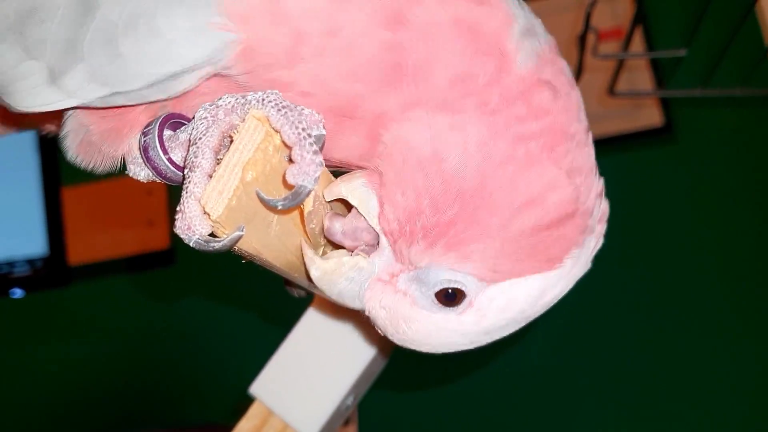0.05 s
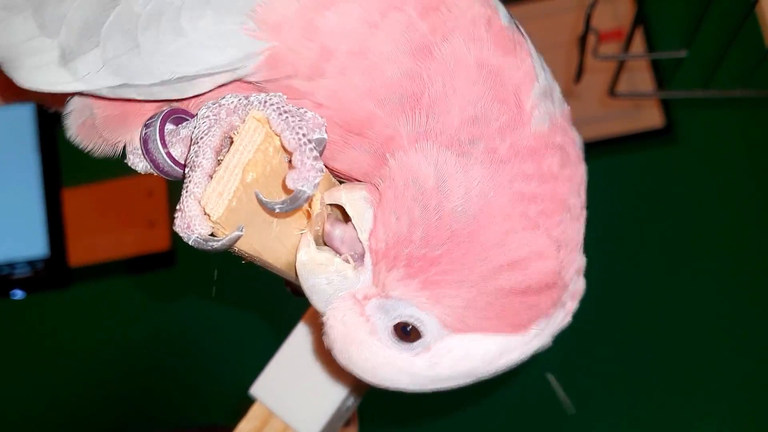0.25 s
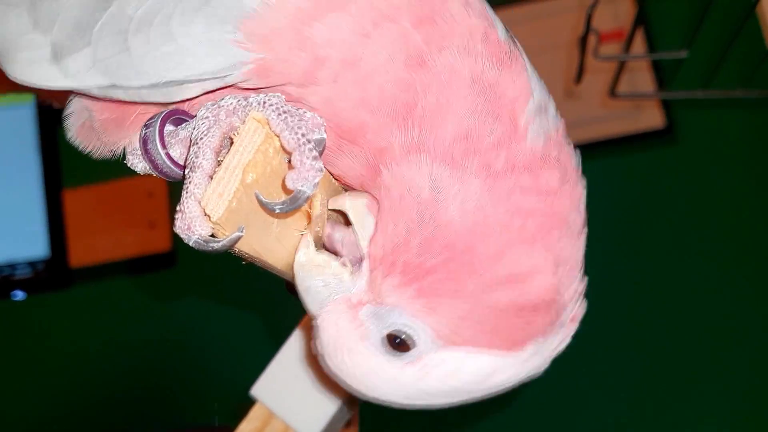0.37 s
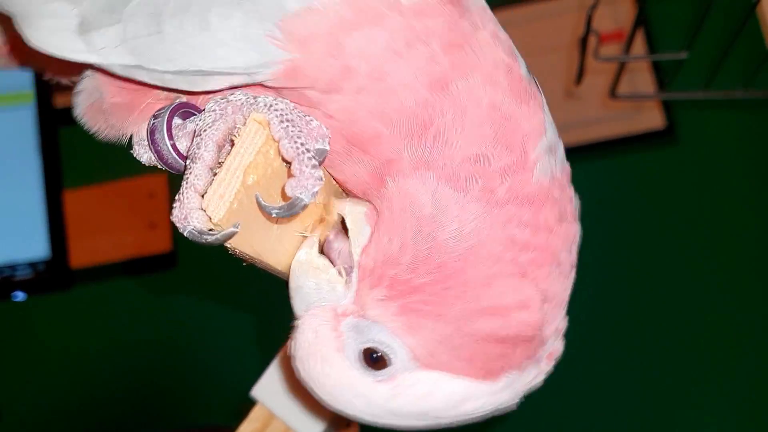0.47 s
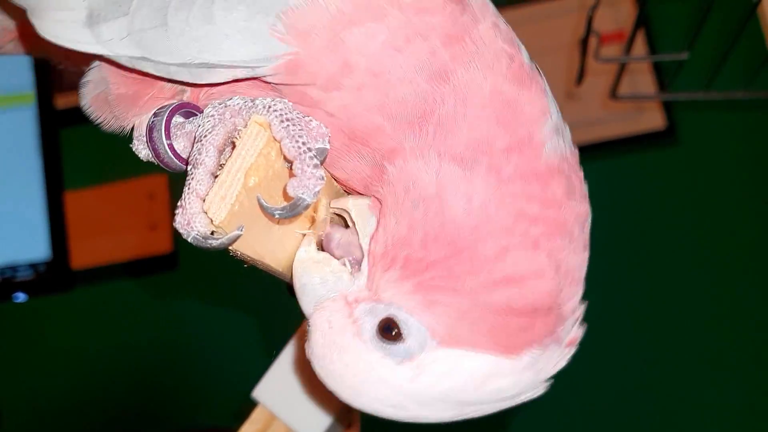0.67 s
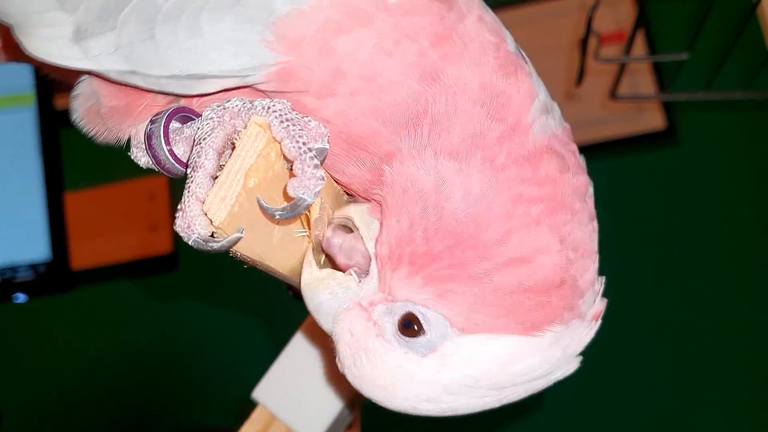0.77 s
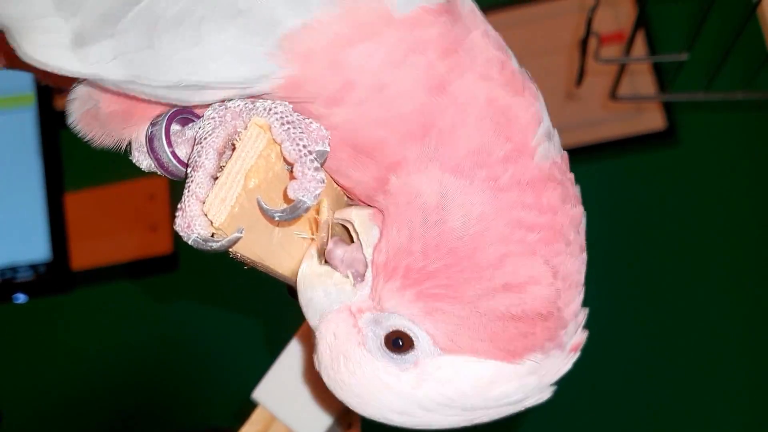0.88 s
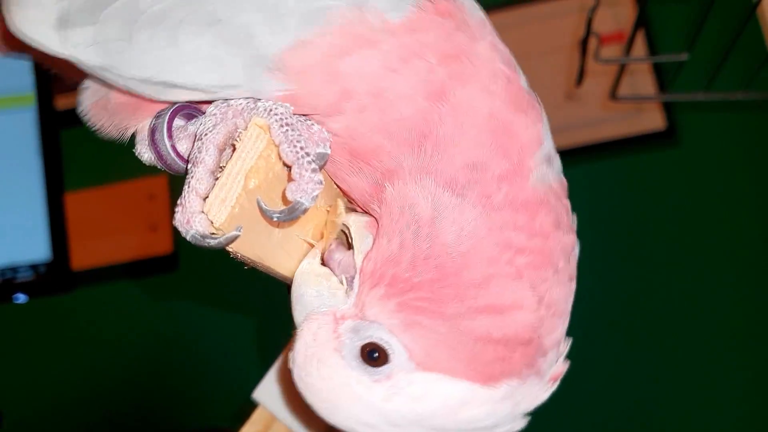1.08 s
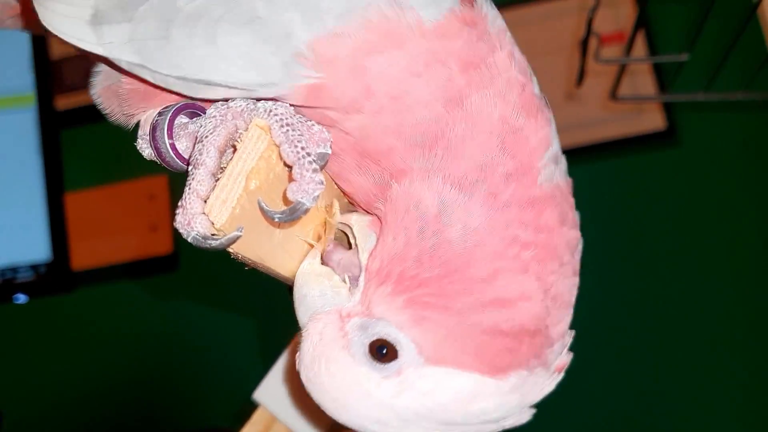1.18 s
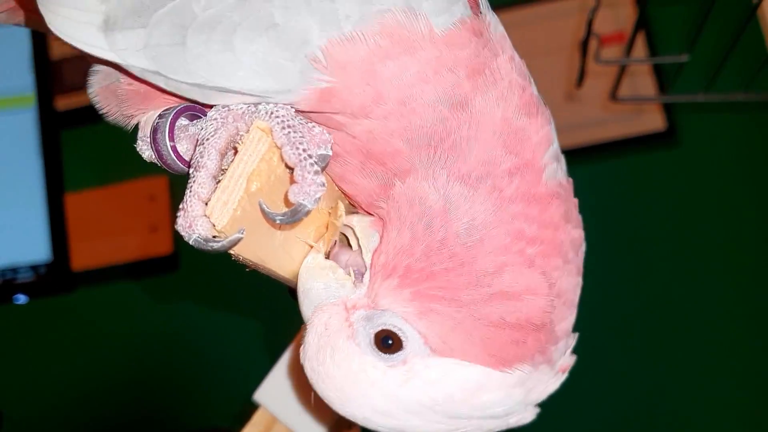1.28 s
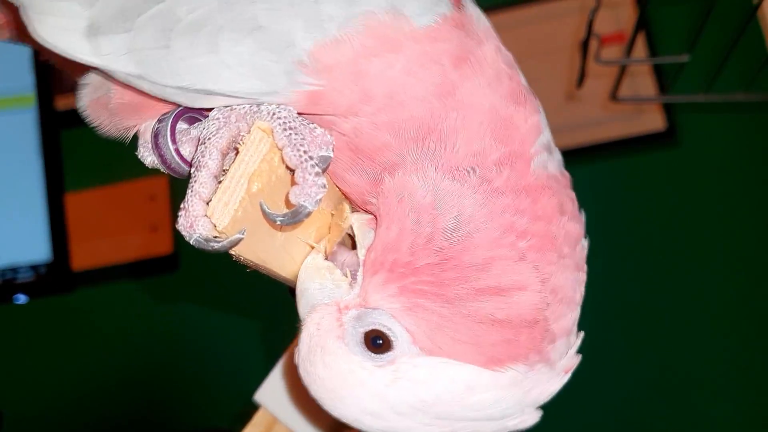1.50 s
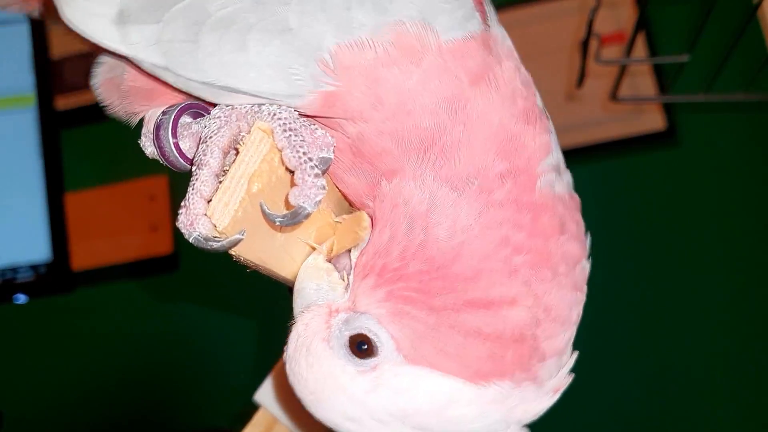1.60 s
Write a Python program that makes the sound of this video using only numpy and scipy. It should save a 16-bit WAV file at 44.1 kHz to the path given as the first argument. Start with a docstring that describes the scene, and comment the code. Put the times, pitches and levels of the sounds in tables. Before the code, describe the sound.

A parrot's beak splits wood with two sharp cracks, then faint snaps and ticks.

```python
"""A parrot splitting wood

A soft, dull ring fades in a small quiet room. Close by, a beak splits wood with two loud cracks; fibres
then snap, tick and crackle. Each fracture is an impulse that excites the block's resonances, and freed
splinters ring briefly. The room adds a short hollow reverberation over a faint rumble and hum."""
import sys
import numpy as np
from scipy import signal
from scipy.fft import rfft, irfft, next_fast_len
from scipy.io import wavfile

SR = 44100
rng = np.random.default_rng(int(sys.argv[2]) if len(sys.argv) > 2 else 0)


def dump_mix(stems):
    """Bounce the given channels to the path in sys.argv[1] as a 16-bit WAV at rate SR."""
    frames = np.atleast_2d(stems).T  # one column per channel
    limited = np.clip(frames, -1, 1)  # hard clip at full scale
    pcm = np.round(limited * 32767).astype(np.int16)
    wavfile.write(sys.argv[1], SR, pcm)


N = 72765
T = np.arange(N) / SR

# Breaking fibres, relative levels: start_s, length_ms, body_db, crack_db, fizz_db, pan_db, room_send_db
FIBRE_SNAPS = [(0.2046, 1.4, -27, -35.5, -37.5, -12, -5), (0.2685, 1.7, -26, -26, -25.5, -4.5, -0.5),
               (.4900, 1.14, -75, -74, -55.5, 0, -1.5), (0.5677, 1.9, -59.5, -58, -54, 1, -2.5),
               (.7005, 1.7, -73, -72, -88, -1.5, -5.5), (.8380, 2, -78, -82, -51, -12.5, -1),
               (.8494, 2, -68, -64, -49.5, -1.5, -25), (.9287, 0.86, -71.5, -71.5, -57, -4, 4),
               (.9850, 0.88, -54, -41.5, -32.5, 0.5, -2), (1.0012, 1.2, -51, -43, -45, 10.5, 2),
               (1.048, 0.71, -53, -54.5, -46, 2, 0), (1.136, 2.9, -75, -81, -40.5, -3, -1),
               (1.1854, 1.6, -88, -78, -51, -4, -3), (1.188, 2.5, -85, -80, -43, -10, -28),
               (1.2055, 1.6, -70.5, -53.5, -39, 6.5, 1.5), (1.208, 1.3, -65, -58, -37, -11, -5.5),
               (1.2329, 2.2, -69.5, -73, -54, -5.5, 0.5), (1.2400, 1.3, -72.5, -61, -41, -8, -17),
               (1.5875, 1, -91.5, -81.5, -64.5, -6, 0), (1.6105, 0.76, -77, -65.5, -42.5, -11, 2),
               (1.6230, 0.685, -61, -63, -37, -5.5, -14), (1.6367, 1.4, -76, -71, -50, -11, -1),
               (1.6490, 2.9, -74, -50, -35, -4, -1)]
# Row one starts the soft, dull reverberant tail at the opening; the rest are scrapes of the beak.
# Levels are relative: start_s, length_s, body_db, crack_db, fizz_db, pan_db
GRAIN_RUNS = [(0.0, 0.015, -63.5, -77.5, -74.5, -5), (0.134, 0.032, -72.5, -57, -70, -12),
              (0.141, 0.17, -54.5, -75, -71, -0.5), (0.477, 0.15, -75.5, -84, -75, -6),
              (0.812, 0.16, -78.5, -81, -76, -3.5), (0.972, 0.0547, -52.5, -81, -50, -7),
              (1.112, 0.114, -77, -69.5, -49.5, -4), (1.318, 0.044, -65.5, -81.5, -77.5, -6),
              (1.589, 0.033, -87, -82.5, -65.5, -1), (1.604, 0.08, -80, -68.5, -54, -9.5)]
# Spectrum common to all fractures: frequency_hz, relative_third_octave_db
WOOD_SPECTRUM = [(120, -30), (250, -22), (450, -21), (800, -15), (1250, -16.5), (2000, -10.5), (3000, -9),
                 (4800, -5.5), (6300, -3.5), (8300, -4.5), (9800, -12), (11000, -2), (12300, 4),
                 (14000, -2), (15800, -9)]
# Resonances of the block: pitch_hz, width_hz, lift_db
WOOD_RESONANCES = [(616, 250, 3.5), (1850, 140, 3), (2548, 420, 9), (4210, 710, 1.5), (7340, 710, 7)]
# Ringing of the block after hard breaks: start_s, pitch_hz, level_db, t60_s
BLOCK_KNOCKS = [(.2053, 1960, -17.5, 0.0063), (.2056, 1400, -23.5, 0.0074), (0.23, 2900, -23, .006),
                (.2053, 690, -30.5, 0.013), (.2689, 2460, -14, 0.0056), (.2687, 720, -24.5, 0.0088),
                (.9860, 1503, -48.5, 0.0096), (1.0015, 570, -39.5, 0.0063), (1.6232, 680, -61.5, 0.0034)]
# A mid-pitched room ring (row one), then splinters: start_s, pitch_hz, level_db, t60_s, bandwidth_ratio
FADING_RINGS = [(0.0, 1770, -57.5, 0.21, 0.28), (0.269, 4700, -73, 0.39, 0.098),
                (.835, 4510, -63, 0.18, 0.13), (0.915, 4430, -72, 0.28, 0.12),
                (1.046, 8340, -51.5, 0.11, 0.053), (1.61, 3110, -67, 0.37, 0.24),
                (1.611, 7300, -77, 0.39, 0.1)]
# Shading of the left side against the right: frequency_hz, gain_db
LEFT_SHADOW = [(300, -6), (1200, 3), (2000, 6), (2800, -9.5), (4000, 3), (6500, -16), (9000, -8.5),
               (12500, 3), (16000, 4.5)]
# Colour of the reflections: frequency_hz, gain_db
ROOM_SPECTRUM = [(150, -2), (320, -2.5), (480, 11), (700, 5), (900, 9), (1060, -0.5), (1350, 12),
                 (1650, 5.5), (1950, 8), (2550, -10.5), (3300, -2.5), (4300, -5), (5500, -10.5),
                 (8000, -5.5), (13000, -10.5), (16000, -9)]
# Reverberation time: frequency_hz, t60_s
ROOM_DECAY = [(200, 0.29), (650, 0.27), (1600, 0.32), (4000, 0.28), (8000, 0.26), (14000, 0.27)]
# Build-up of the reflections: frequency_hz, rise_s
ROOM_RISE = [(600, 0.0058), (1600, 0.013), (4000, 0.00033), (12000, 0.0013)]
# Strongest room modes: pitch_hz, gain_db
ROOM_RESONANCES = [(500, -17), (594, -20), (689, -14.5), (766, -17), (831, -17.5), (894, -19), (1272, -14),
                   (1302, -16), (1411, -10), (1475, -13), (1553, -17), (1617, -19), (1759, -23),
                   (1885, -21), (1947, -16.5), (1996, -22)]
# Soft low swells: peak_s, half_length_s, centre_hz, level_db
LOW_SWELLS = [(0.177, 0.019, 677.5, -58), (1.017, 0.034, 465, -55), (1.13, 0.13, 63, -68.5),
              (1.06, 0.22, 338, -72)]
# Steady room noise: frequency_hz, third_octave_db
NOISE_FLOOR = [(25, -91.5), (50, -80.5), (90, -83), (125, -83), (175, -77), (280, -80.5), (500, -82),
               (1000, -86), (2000, -87), (5000, -88.5), (10000, -93), (15000, -88.5)]
# Steady tones: pitch_hz, level_db
HUM_TONES = [(94, -76.5), (172, -76.5), (276, -82.5)]

BODY_CRACK_FIZZ_HZ = (1694, 6600, 12070)   # where a fracture's three levels apply
SNAP_COHERENCE, ROOM_COHERENCE, FLOOR_COHERENCE = 0.67, 0.37, 0.26   # left-right correlation
EDGES_HZ = 22.1 * 2 ** (np.arange(30) / 3)   # third-octave bands
CENTRES_HZ = np.sqrt(EDGES_HZ[1:] * EDGES_HZ[:-1])
BANDS = list(zip(CENTRES_HZ, EDGES_HZ, EDGES_HZ[1:]))


def fibre_snaps(gain_db=-26):
    """Brittle fracture releases strain as an impulse; returns the direct sound and the room's share."""
    direct, to_room = np.zeros((2, 2, N))
    for start_s, length_ms, *levels_db, pan_db, send_db in FIBRE_SNAPS:
        snap = amp(gain_db) * pan(pan_db) * wood_response(fracture_burst(length_ms), levels_db)
        add(direct, start_s, snap)
        add(to_room, start_s, amp(send_db) * snap)
    return direct, to_room


def fracture_burst(length_ms, size=512):
    """A brief cluster of fractures is broadband: it swells and dies with no pitch standing out."""
    progress = T[:size] / (length_ms / 2000)   # 1 at the peak
    envelope = progress ** 2 * np.exp(-2 * progress)
    gate = np.minimum(10 * envelope / envelope.max(), 1)
    burst = stereo_noise(size, SNAP_COHERENCE) * envelope
    for _ in range(3):   # flatten the spectrum, then confine the burst in time
        spectrum = rfft(burst)
        burst = irfft(spectrum / (np.abs(spectrum) + 1e-20)) * gate
    return burst


def wood_response(force, levels_db):
    """Source and filter: the wood's resonances colour the force as a minimum-phase system."""
    n = 2 * next_fast_len(force.shape[-1] + 1000)
    hz = np.maximum(np.arange(n // 2 + 1) * SR / n, EDGES_HZ[0])
    db = at_hz(WOOD_SPECTRUM, hz) + at_hz(list(zip(BODY_CRACK_FIZZ_HZ, levels_db)), hz)
    db += sum(lift / (1 + (2 * (hz - pitch) / width) ** 2) for pitch, width, lift in WOOD_RESONANCES)
    third_octave_hz = hz * (EDGES_HZ[1] - EDGES_HZ[0]) / CENTRES_HZ[0]
    bass_cut = 1 + (150 / hz) ** 2
    cepstrum = irfft(np.log(amp(db) * np.sqrt(SR / 2 / third_octave_hz) / bass_cut))
    lag = np.arange(n)
    causal_fold = 1 + np.sign(n / 2 - lag) - (lag == 0)
    response = np.exp(rfft(cepstrum * causal_fold))
    return irfft(rfft(unit(force), n) * response)


def grain_runs(gain_db=-6.5, grains_per_s=830, spread_db=1.5, ramp_s=0.0068):
    """Poisson impulse trains: the first starts a dull room tail; in the rest, fibres yield to the beak."""
    out = np.zeros((2, N))
    for start_s, length_s, *levels_db, pan_db in GRAIN_RUNS:
        n = int(length_s * SR)
        impulses = (rng.random(N) < grains_per_s / SR) * rng.choice([-1, 1], N)
        grains = impulses * amp(spread_db * np.minimum(rng.exponential(1, N), 4))
        envelope = np.clip(np.minimum(T[:n], length_s - T[:n]) / ramp_s, 0, 1)
        run = wood_response(grains[:n] * envelope, levels_db)
        add(out, start_s, amp(gain_db) * np.sqrt(length_s) * pan(pan_db) * run)
    return out


def block_knocks(rise_s=0.00054):
    """Damped free vibration: the block rings for a few cycles against the gripping foot."""
    out = np.zeros((2, N))
    attack = 1 - np.exp(-T / rise_s)
    for start_s, hz, db, t60_s in BLOCK_KNOCKS:
        add(out, start_s, amp(db) * np.sin(2 * np.pi * hz * T) * attack * decay(T, t60_s))
    return out * pan(db=-0.5)


def block_jolt(start_s=0.2686, pitch_hz=129.9):
    """As it splits, the whole block thumps like a heavily damped oscillator."""
    out = np.zeros((2, N))
    thump = np.cos(2 * np.pi * pitch_hz * T) * decay(T, t60_s=0.0068)
    add(out, start_s, amp(-31.5) * pan(db=-15) * thump)
    return out


def fading_rings():
    """Damped narrow-band resonance: the room rings at the very start, freed splinters later on."""
    out = np.zeros((2, N))
    for start_s, hz, db, t60_s, width in FADING_RINGS:
        ring = noise_band(stereo_noise(N, ROOM_COHERENCE), hz * (1 - width / 2), hz * (1 + width / 2))
        add(out, start_s, amp(db) * ring * decay(T, t60_s))
    return out * pan(db=-5)


def far_side(x, delay_s=0.0003137):
    """Path difference and acoustic shadow: the left side hears the beak later and partly shaded."""
    n = 2 * next_fast_len(N)
    hz = np.arange(n // 2 + 1) * SR / n
    delay = np.exp(-2j * np.pi * hz * delay_s)
    return irfft(rfft(x, n) * amp(at_hz(LEFT_SHADOW, hz)) * delay)[:N]


def reverberation(x, size=24000):
    """Diffuse reflections and room modes build up, then decay at a rate set by frequency."""
    t, tail = T[:size], 0

    def envelope(hz):
        return (1 - np.exp(-(t / at_hz(ROOM_RISE, hz)) ** 2)) * decay(t, at_hz(ROOM_DECAY, hz))

    for hz, low, high in BANDS[7:]:   # from about 110 Hz up
        reflections = band_pass(stereo_noise(size, ROOM_COHERENCE), low, high) * envelope(hz)
        tail += np.sqrt(2 * (high - low) / SR) * unit(reflections)
    colour = amp(at_hz(ROOM_SPECTRUM, np.arange(size + 1) * SR / (2 * size)))
    tail = irfft(rfft(tail, 2 * size) * colour)[:, :size]
    for hz, db in ROOM_RESONANCES:
        phase_cycles = rng.random() + 0.38 * rng.random((2, 1))   # offset on each side
        tail += amp(db) * unit(np.sin(2 * np.pi * (hz * t + phase_cycles)) * envelope(hz))
    return pan(db=-2) * signal.fftconvolve(x[None], tail, axes=1)[:, :N]


def rumble():
    """Amplitude modulation: low noise, an octave wide, swells under Gaussian envelopes."""
    out = 0
    for peak_s, half_s, hz, db in LOW_SWELLS:
        noise = noise_band(stereo_noise(N, FLOOR_COHERENCE), hz / np.sqrt(2), hz * np.sqrt(2))
        out += amp(db) * noise * np.exp(-((T - peak_s) / half_s) ** 2)
    return out


def background():
    """The noise floor is a continuous spectrum of rumble and hiss plus a line spectrum of hum."""
    white = [stereo_noise(N, FLOOR_COHERENCE) for _ in range(2)]   # adjacent bands stay independent
    air = sum(amp(at_hz(NOISE_FLOOR, hz)) * noise_band(white[k % 2], low, high)
              for k, (hz, low, high) in enumerate(BANDS))
    hum = sum(amp(db) * np.sqrt(2) * np.sin(2 * np.pi * (hz * T + rng.random())) for hz, db in HUM_TONES)
    return pan(db=-1.5) * (air + hum)


def amp(db):
    """Decibels to amplitude ratio."""
    return 10 ** (np.asarray(db) / 20)


def at_hz(table, hz):
    """Interpolation on a log-frequency axis."""
    frequencies, values = np.transpose(table)
    return np.interp(np.log(np.maximum(hz, 1)), np.log(frequencies), values)


def unit(x):
    """Normalisation to unit energy."""
    return x / np.sqrt(np.sum(x ** 2, axis=-1, keepdims=True) + 1e-30)


def decay(t, t60_s):
    """Exponential decay, 60 dB in t60_s."""
    return np.exp(-np.log(1000) * t / t60_s)


def pan(db):
    """Constant-power panning; db is left over right."""
    return np.sqrt(2) * unit(amp([db / 2, -db / 2]))[:, None]


def add(out, start_s, x):
    """Superposition of a sound at its onset."""
    i = int(np.clip(start_s * SR, 0, N - 1))
    out[:, i:i + x.shape[-1]] += x[..., :N - i]


def stereo_noise(size, coherence):
    """White noise, partly correlated between the sides."""
    mid, side = rng.standard_normal((2, size))
    return np.sqrt(1 + coherence) * mid + np.sqrt(1 - coherence) * side * [[1], [-1]]


def band_pass(x, low_hz, high_hz):
    """Attenuation outside one band."""
    return signal.sosfilt(signal.butter(2, [low_hz, high_hz], "band", fs=SR, output="sos"), x)


def noise_band(white, low_hz, high_hz):
    """Band-limited noise of unit power."""
    return np.sqrt(N) * unit(band_pass(white, low_hz, high_hz))


def scene():
    """Direct sound from a little to the right adds to the reverberant field and the background."""
    (snaps, snaps_to_room), grains, knocks = fibre_snaps(), grain_runs(), block_knocks()
    left, right = np.sqrt(SR) * (snaps + grains) + knocks
    _, to_room = np.sqrt(SR) * (snaps_to_room + grains) + knocks
    direct = np.array([far_side(left), right])
    return direct + reverberation(to_room) + fading_rings() + block_jolt() + rumble() + background()


def record(dry, cutoff_hz=16200):
    """A steep low-pass filter limits the bandwidth."""
    return signal.sosfilt(signal.ellip(10, 0.2, 70, cutoff_hz, fs=SR, output="sos"), dry)


dry = scene()
out = record(dry)
dump_mix(out)
```